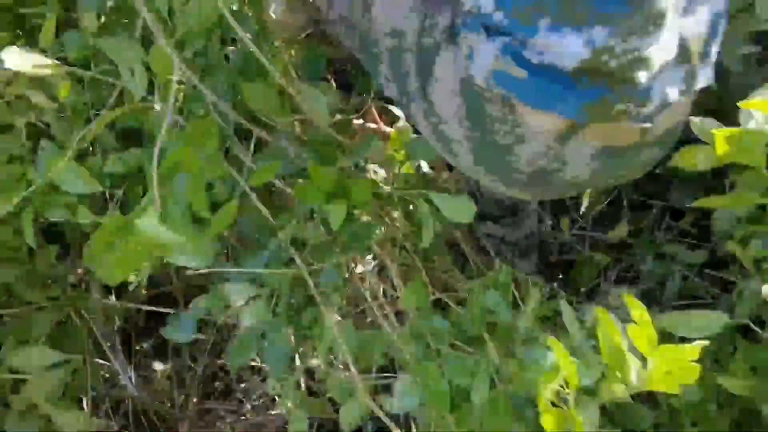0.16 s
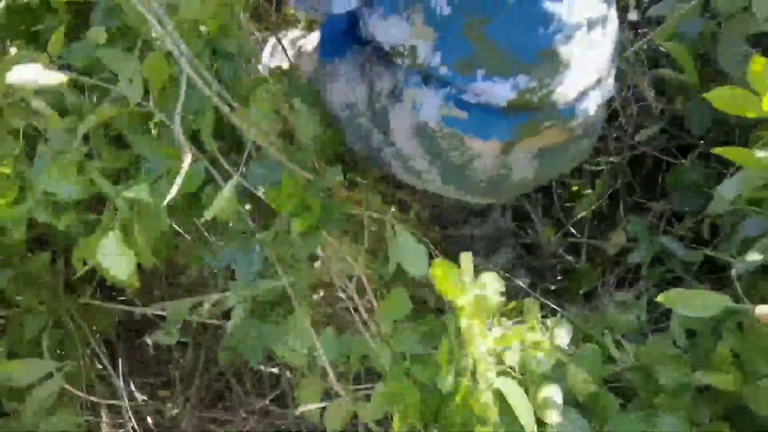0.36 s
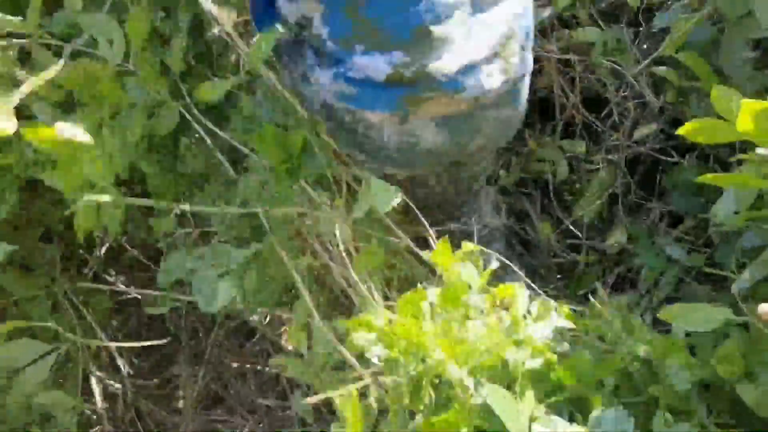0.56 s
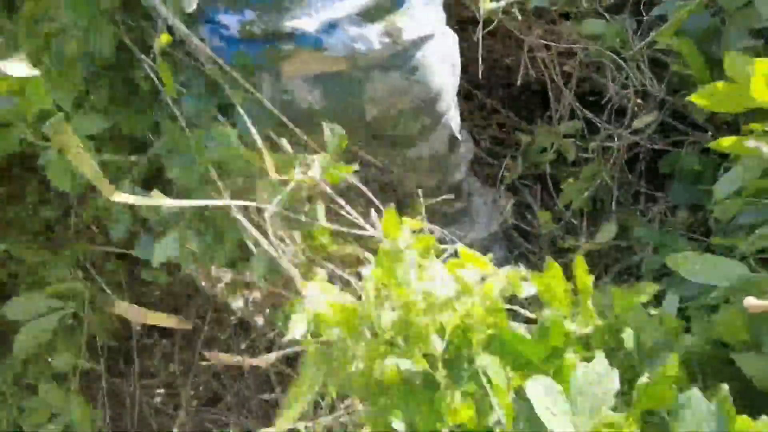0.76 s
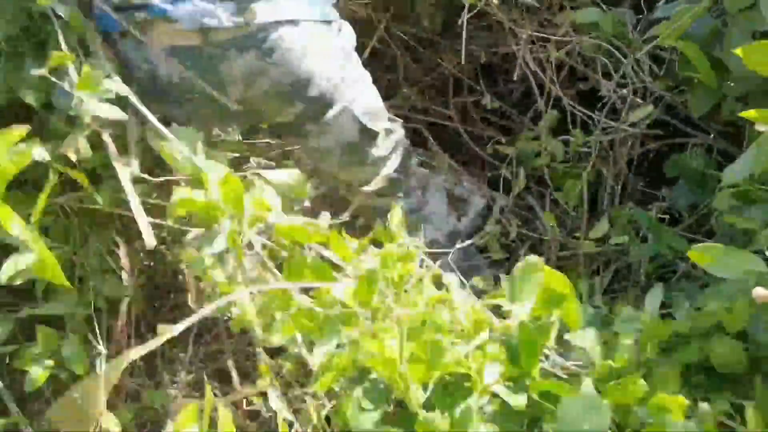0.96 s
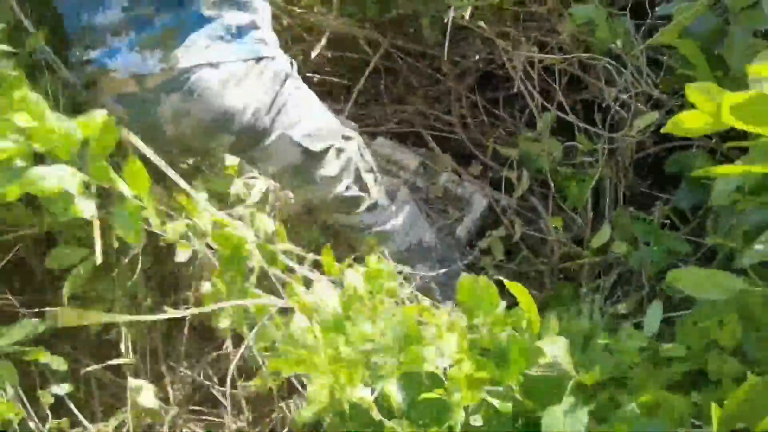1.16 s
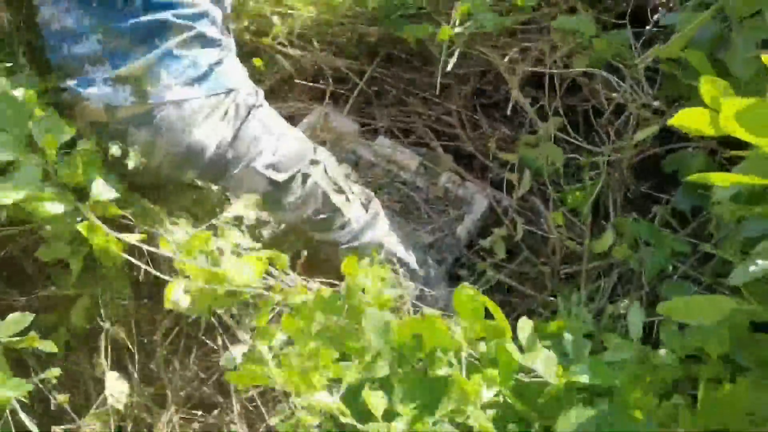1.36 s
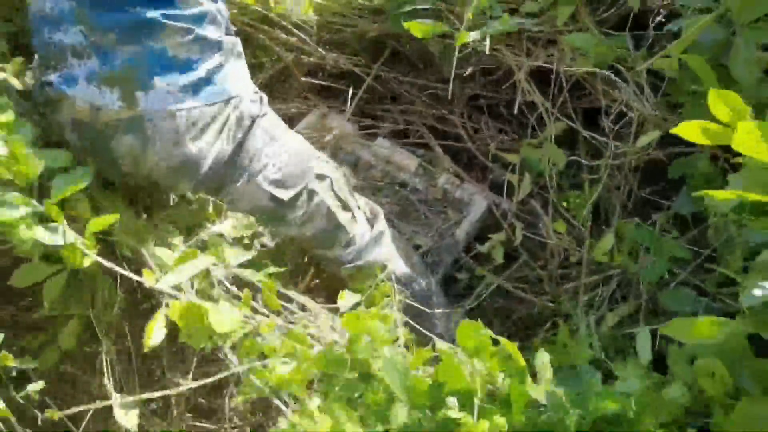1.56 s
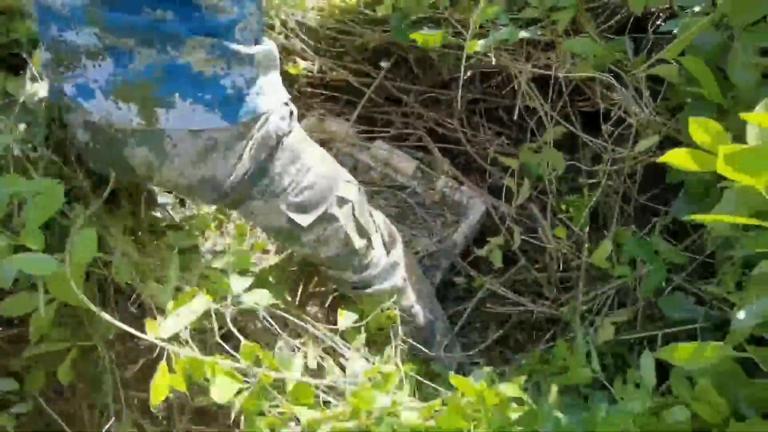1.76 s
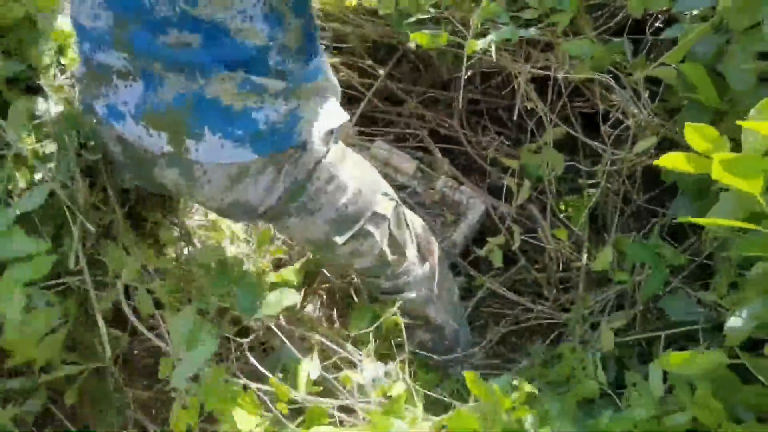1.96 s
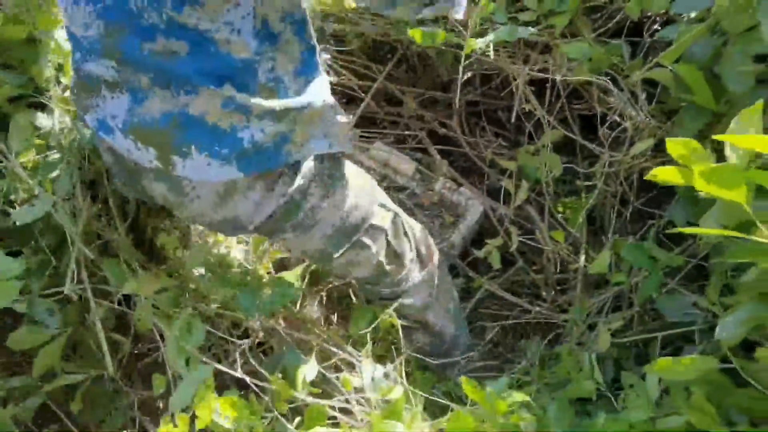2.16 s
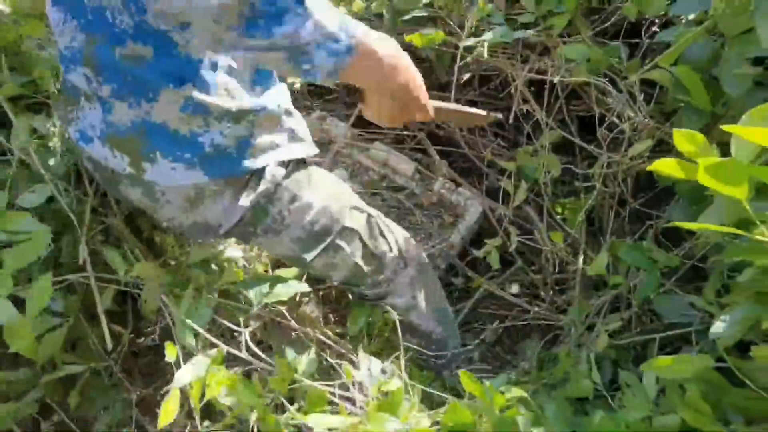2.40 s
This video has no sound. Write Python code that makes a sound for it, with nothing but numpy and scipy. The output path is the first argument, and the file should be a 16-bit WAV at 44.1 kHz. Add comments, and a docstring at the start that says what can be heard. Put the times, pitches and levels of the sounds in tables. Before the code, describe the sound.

Dry leaves and stems rustle, crunch and snap as someone pushes through dense undergrowth, then quietens

```python
"""Dry leaves rustle and crunch as legs push through undergrowth outdoors, close to two spaced microphones.
Rustle and crunches are dense random clicks filtered in bands; breaking twigs add decaying spits of bright noise.
Woody stems drag, thump and knock in the low range: sparser clicks in bands, and short damped swings.
Most of the bass is alike in both microphones, the left a little earlier; the treble differs from side to side."""
import sys
import numpy as np
from scipy import signal
from scipy.fft import rfft, irfft, next_fast_len
from scipy.io import wavfile

SR = 44100
rng = np.random.default_rng(int(sys.argv[2]) if len(sys.argv) > 2 else 0)


def boost(x):
    """Linear amplitude factor 10**(x/20) for a level x in decibels (scalar or array-like)."""
    u = np.asarray(x, float) / 20
    return 10 ** u


def wav_record(signal):
    """Record a signal, one row per channel, as 16-bit PCM in the file named by sys.argv[1]."""
    frames = np.transpose(np.atleast_2d(signal))
    bounded = np.clip(frames, -1, 1)
    # unit amplitude maps onto the largest positive 16-bit level
    quanta = np.round(bounded * 32767).astype(np.int16)
    wavfile.write(sys.argv[1], SR, quanta)


N = 107251

# How hard the leaves are brushed: t/s, level/dB
BRUSHING = [(0, -30.5), (.09, -33), (.17, -30), (.25, -33.5), (.45, -34), (.475, -26.5), (.58, -27.5),
            (.64, -33), (.7, -33), (.75, -25), (.82, -30), (.99, -30), (1.09, -29.5), (1.15, -32.5),
            (1.22, -32.5), (1.3, -31.5), (1.41, -32.5), (1.455, -31.5), (1.48, -39.5), (1.64, -38),
            (1.67, -39), (1.91, -39.5), (1.935, -40.5), (2.03, -43.5), (2.21, -51.5), (2.25, -49),
            (2.39, -43), (2.43, -32)]
# Power spectrum of the leaf sound: f/Hz, relative density/(dB per Hz)
LEAF_SPECTRUM = [(530, -63), (900, -21), (1340, -14.5), (2450, -9), (3000, -6), (4500, -5.5), (6100, 1),
                 (7200, -2.5), (8500, 0.5), (11000, -5.5), (14500, -9), (16000, -10.5), (18000, -27)]
# Thumps and knocks of stems: t/s, peak level/dB, t60/s, strongest f/Hz, hardness/(dB per octave)
KNOCKS = [(0.185, -33.5, 0.19, 144, 9), (.424, -12, 0.013, 205, 0), (.501, -17, 0.094, 2080, -1),
          (0.505, -14.5, 0.03, 503, 6), (0.546, -20, 0.017, 292, 6.5), (0.553, -22.5, 0.023, 208, -7),
          (0.579, -17.5, 0.021, 187, 1), (0.605, -17, 0.021, 526, 9.5), (0.67, -17, 0.071, 2200, 2),
          (.675, -15, 0.03, 260, -2), (0.684, -19.5, 0.028, 240, 2), (0.716, -20, 0.041, 1390, -8),
          (0.742, -26, 0.05, 790, -2), (0.851, -20, 0.065, 233, -5), (.897, -27, 0.046, 557, -5),
          (.921, -29.5, 0.033, 570, -19), (1.033, -21.5, 0.11, 175, -5), (1.056, -27.5, 0.075, 195, -3.5),
          (1.115, -25.5, 0.093, 540, -6), (1.173, -9.5, 0.031, 175, 0), (1.177, -8, 0.011, 620, 1),
          (1.194, -20.5, 0.045, 940, 7), (1.437, -30, 0.093, 188.6, 4), (1.465, -32, 0.036, 118, -35),
          (1.696, -37, 0.015, 790, 1), (1.725, -33.5, 0.043, 164, 6), (1.752, -33.5, 0.035, 139, 4),
          (1.906, -32.5, 0.014, 2270, 7.5), (1.957, -26, 0.0052, 800, 1.5), (2.059, -41.5, 0.022, 1800, 1),
          (2.229, -37, 0.16, 216, -3), (2.267, -34, 0.032, 245, -0.5), (2.404, -29, 0.042, 197, -6),
          (2.413, -22.5, 0.038, 186, 0)]
# Level of the left channel relative to the right, negative where the left is quieter: f/Hz, level/dB
LEFT_OVER_RIGHT_DB = [(40, -3), (150, -2), (350, -.8), (700, -1), (1400, -2.7), (2800, -.6), (13000, .2)]


def rms_one(x):
    """Normalization of mean power: scale to rms 1."""
    return x / np.sqrt(np.mean(x ** 2) + 1e-20)


def at_hz(points, hz):
    """Interpolation along a logarithmic frequency axis, linear in the tabulated value."""
    table = np.array(points)
    return np.interp(np.log(hz), np.log(table[:, 0]), table[:, 1])


def left_right_gain(hz):
    """Interchannel level difference, shared equally between the two sides."""
    return boost(at_hz(LEFT_OVER_RIGHT_DB, hz) * np.array([[.5], [-.5]]))


def drift(rate_hz):
    """Low-passed noise: white noise through two equal real poles at rate_hz gives a wander of rms 1."""
    step = 40  # samples between drawn values
    pole = np.exp(-2 * np.pi * rate_hz * step / SR)
    white = rng.standard_normal(N // step + 1002)
    slow = signal.lfilter([1], [1, -2 * pole, pole * pole], white)[1000:]
    return np.interp(np.arange(N) / step, np.arange(len(slow)), rms_one(slow))


def grains(per_s, spread_db):
    """Shot noise: two pairs of independent random click trains, of uneven click size."""
    excess_db = spread_db * np.minimum(rng.exponential(1, (4, N)), 5)
    sizes = boost(excess_db) * rng.standard_normal((4, N))
    present = rng.random((4, N)) < per_s / SR
    return rms_one(sizes * present + 1e-9).reshape(2, 2, N)


def bursts(events, rise_s, crest_db):
    """Exponential growth and decay: power of each event, every 8 samples, crest_db below its peak level."""
    start, db, t60 = (np.array(events)[:, k, None] for k in range(3))
    t = np.arange(0, N, 8) / SR - start
    growth = t / np.maximum(rise_s, 3e-4)
    decay = -np.log(1000) * t / np.maximum(t60, .008)
    return boost(2 * (db - crest_db)) * np.exp(2 * np.where(t < 0, growth, decay))


def event_colour(events, hz, focus_db, width_oct, hardness):
    """Spectral emphasis in dB: each event lifts its favoured pitch; positive hardness tilts towards the treble."""
    octaves = np.log2(hz / np.array(events)[:, 3, None])
    return focus_db * np.exp(-.5 * (octaves / width_oct) ** 2) + hardness * np.log2(hz)


def brushwood(clicks, spectrum, push_curve, burst_power, colour, flicker_db, patch_db, rate_hz):
    """Band-filtered shot noise: a steady push plus coloured bursts set the power of clicks in each band."""
    # Likeness of the two channels: f/Hz, correlation
    likeness = [(40, .8), (120, .97), (400, .975), (900, .92), (1400, .4), (2500, .1), (8000, .02)]
    per_octave = 5  # bands
    lowest, highest = spectrum[1][0], spectrum[-2][0]
    steps = np.arange(-1, per_octave * np.log2(highest / lowest) + 1)
    edges = lowest * 2 ** (steps / per_octave)
    centres, widths = np.sqrt(edges[1:] * edges[:-1]), np.diff(edges)

    share = boost(2 * at_hz(spectrum, centres)) * widths
    favour = boost(2 * colour(centres)) * share
    burst = (favour / favour.sum(axis=1, keepdims=True)).T @ burst_power
    push_db = np.interp(np.arange(N) / SR, *np.transpose(push_curve))
    push = boost(push_db + flicker_db * drift(rate_hz))

    out = 0
    for k, band_share in enumerate(share / share.sum()):
        steady = band_share * (push * boost(patch_db * drift(rate_hz))) ** 2
        power = steady + np.interp(np.arange(N), np.arange(0, N, 8), burst[k])
        # white clicks lose power in proportion to bandwidth; mid and side carry half the power each
        drive = clicks[k % 2] * np.sqrt(power * SR / 4 / widths[k])
        limits = np.minimum(edges[k:k + 2], [.44 * SR, .45 * SR])
        sos = signal.butter(2, limits, "band", fs=SR, output="sos")
        led_in = np.pad(drive, ((0, 0), (4096, 0)), "reflect")  # lets the filter settle
        mid, side = signal.sosfilt(sos, led_in)[:, 4096:]
        alike = np.clip(at_hz(likeness, centres[k]), 0, 1)
        pair = np.sqrt(1 + alike) * mid + np.sqrt(1 - alike) * side * [[1], [-1]]
        out = out + left_right_gain(centres[k]) * pair
    return out


def stems():
    """Stick-slip friction and impact: sparse clicks in low bands for dragging, thumps and knocks."""
    # How hard the stems are dragged: t/s, level/dB
    dragging = [(0, -40), (.17, -37.5), (.3, -43), (.39, -34.5), (.46, -34.5), (.56, -29.5), (.64, -39.5),
                (.72, -26.5), (.82, -38), (.99, -40), (1.1, -41), (1.16, -32), (1.24, -41.5), (1.3, -47.5),
                (1.41, -42), (1.46, -50), (1.5, -48.5), (1.66, -54), (1.9, -49), (1.93, -54.5),
                (2.21, -57.5), (2.27, -57), (2.39, -56), (2.43, -40)]
    # Power spectrum of the stem sound: f/Hz, relative density/(dB per Hz)
    stem_spectrum = [(24, -30), (40, -34), (85, -7.5), (141, -2), (288, -1.5), (361, -14), (478, -3),
                     (702, -11.5), (928, -11), (1510, -16), (2260, -12.5), (2600, -16), (3380, -105),
                     (5720, -120)]
    hardness = np.array(KNOCKS)[:, -1:]

    def colour(hz):
        """Spectral emphasis of the knocks, half an octave wide."""
        return event_colour(KNOCKS, hz, focus_db=7, width_oct=.5, hardness=hardness)

    slips = grains(per_s=900, spread_db=2)
    knock_power = bursts(KNOCKS, rise_s=.003, crest_db=6)
    return brushwood(slips, stem_spectrum, dragging, knock_power, colour,
                     flicker_db=-1, patch_db=1.5, rate_hz=19.0)


def strikes():
    """Damped vibration: each struck stem swells and dies quickly at its own pitch and a weaker overtone."""
    ring_share, most_cycles = 0.67, 15.4  # ring time: a share of the knock's t60, or at most so many cycles
    overtone_ratio, overtone_db = 2.34, -6
    below_db = 3.5  # under the knock's peak level
    t = np.arange(4096) / SR
    out = np.zeros((2, N + 4096))
    for (start, db, t60, hz, _), phase in zip(KNOCKS, rng.random((len(KNOCKS), 2))):
        fade = t * np.log(1000) / min(ring_share * t60, most_cycles / hz)
        fundamental = np.sin(2 * np.pi * (hz * t + phase[0]))
        overtone = np.sin(2 * np.pi * (overtone_ratio * hz * t + phase[1]))
        swing = fundamental + boost(overtone_db) * np.exp(-fade) * overtone
        envelope = fade * np.exp(1 - fade)  # greatest value 1
        first = int(start * SR)
        out[:, first:first + len(t)] += boost(db - below_db) * envelope * swing * left_right_gain(hz)
    return out[:, :N]


def leaves():
    """Superposed micro-impacts: dense clicks in bright bands make the rustle and its crunches."""
    # Crunches of dry leaves: t/s, peak level/dB, t60/s, strongest f/Hz, build-up time/s
    crunches = [(0.151, -13, 0.14, 10000, 0.007), (.176, -10.5, .14, 9300, 0.0053),
                (.333, -22.5, 0.63, 8490, 0.0029), (.466, -25, .13, 8790, 0.0023),
                (0.501, -8, 0.06, 8500, 0.0041), (0.603, -10, 0.023, 8540, 0.0015),
                (0.67, -9, 0.088, 7700, 0.0031), (0.727, -14.5, 0.061, 6340, 0.0034),
                (0.89, -15, 0.11, 7000, 0.0057), (1.11, -7, 0.014, 9400, 0.0024),
                (1.182, -14, 0.14, 5850, 0.0081), (1.428, -11.5, 0.069, 9000, 0.0026),
                (1.749, -21, 0.034, 8450, 0.0074), (1.963, -20.5, 0.026, 9150, 0.0088),
                (2.267, -20.5, 0.14, 8900, 0.016), (2.416, -42, 0.065, 8600, .004)]

    def colour(hz):
        """Spectral emphasis of the crunches, an octave wide."""
        return event_colour(crunches, hz, focus_db=10.5, width_oct=1, hardness=0)

    snaps = grains(per_s=5000, spread_db=0)
    crunch_power = bursts(crunches, rise_s=np.array(crunches)[:, -1:], crest_db=9)
    return brushwood(snaps, LEAF_SPECTRUM, BRUSHING, crunch_power, colour,
                     flicker_db=.9, patch_db=2, rate_hz=68.0)


def random_ticks():
    """Poisson process: small twigs break at random, their levels following the brushing."""
    per_s, over_brushing_db, spread_db, t60_s = 110, -4, 2, .012
    draws = rng.random((400, 3))
    when = np.cumsum(-np.log(draws[:, 0]) / per_s)
    ticks = []
    for start, (_, a, b) in zip(when, draws):
        if start < N / SR:
            brushing_db = np.interp(start, *np.transpose(BRUSHING))
            db = brushing_db + over_brushing_db - spread_db * np.log(a)
            ticks.append((start, db, t60_s, 4000 * 3 ** b))  # 4 to 12 kHz
    return ticks


def twigs():
    """Resonance under a sudden release: each break is a dying spit of noise with one pitch standing out."""
    # Single twigs breaking: t/s, level/dB (before below_db is taken off), t60/s, strongest f/Hz
    single_breaks = [(.109, -18, 0.035, 11400), (0.149, -11.5, 0.038, 9700), (0.177, -10, 0.023, 9300),
                     (.276, -20, 0.023, 8300), (0.478, -14, 0.029, 8900), (0.506, -14, 0.028, 6350),
                     (0.603, -15, .028, 8700), (0.67, -12, 0.059, 8700), (.728, -19, 0.045, 6100),
                     (1.1125, -17, 0.018, 8000), (1.278, -15.5, 0.026, 5660), (1.372, -18.5, 0.033, 6370),
                     (1.392, -20, 0.028, 3320), (1.426, -26, 0.041, 9600), (1.578, -19.5, 0.039, 9700),
                     (1.626, -29, 0.02, 6400), (1.75, -33, .02, 8670), (1.807, -22, 0.015, 5840),
                     (1.861, -20.5, 0.021, 6100), (1.907, -20.5, 0.024, 8450), (1.9588, -15.5, 0.028, 8300),
                     (2.247, -36, .03, 7000), (2.266, -11, 0.027, 8600), (2.4153, -20.5, 0.019, 8400)]
    below_db, q, broad_db = 6.5, 14, -8.5  # broad_db: noise floor beside the resonance
    crack_t60_s, rise_s = 0.003, .0002
    ticks = random_ticks()
    size = 2048
    t = np.arange(size) / SR
    hz = np.arange(1, size // 2 + 2) * SR / size
    out = np.zeros((2, N + size))
    for start, db, t60, peak_hz in [(s, db - below_db, *rest) for s, db, *rest in single_breaks] + ticks:
        resonance = 1 / np.abs(1 + 1j * q * (hz / peak_hz - peak_hz / hz))
        colour = boost(at_hz(LEAF_SPECTRUM, hz)) * (boost(broad_db) + resonance)
        spit = rms_one(irfft(rfft(rng.standard_normal((2, size))) * colour, size))
        decay = boost(db - 60 * t / max(t60, .004))
        crack = boost(db - 60 * t / crack_t60_s)  # the first instant of the break
        first = int(start * SR)
        out[:, first:first + size] += (decay + crack) * spit * np.minimum(t / rise_s, 1)
    return out[:, :N]


def spectral_ripple(x):
    """Comb interference: six short delayed copies a side, alternating in sign, give a fine random ripple."""
    copy_db, longest_s = -14.5, .009
    lags = (rng.uniform(.05, 1, (2, 6)) * longest_s * SR).astype(int) + 1
    out = x.copy()
    for side in range(2):
        for k, lag in enumerate(lags[side]):
            out[side, lag:] += boost(copy_db) * (-1) ** k * x[side, :-lag]
    return out


def scene():
    """Superposition: leaves and twigs pass through the ripple, the stems are added without it."""
    return spectral_ripple(leaves() + twigs()) + stems() + strikes()


def low_pass(x):
    """Removes everything above the highest recorded frequency."""
    return signal.sosfilt(signal.butter(12, 16460, fs=SR, output="sos"), x)


def record(dry):
    """Time difference of arrival: the right microphone hears all a little late; both lose deep bass and top."""
    left_lead_s = 0.00012
    size = next_fast_len(N + 64)
    hz = np.arange(size // 2 + 1) * SR / size
    late = irfft(rfft(dry[1], size) * np.exp(-2j * np.pi * hz * left_lead_s), size)[:N]
    low_cut = signal.butter(4, 65.4, "high", fs=SR, output="sos")
    top_cut = signal.cheby2(10, 40, 16000, fs=SR, output="sos")  # 40 dB down from 16 kHz
    mix = signal.sosfilt(np.vstack([low_cut, top_cut]), [dry[0], late])
    return low_pass(mix)


dry = scene()
out = record(dry)
wav_record(out)
```